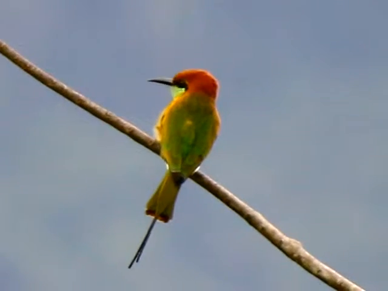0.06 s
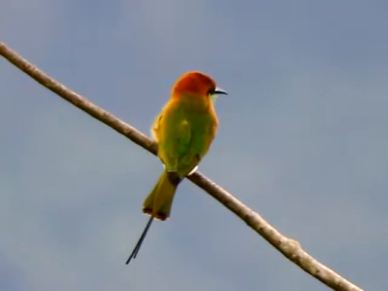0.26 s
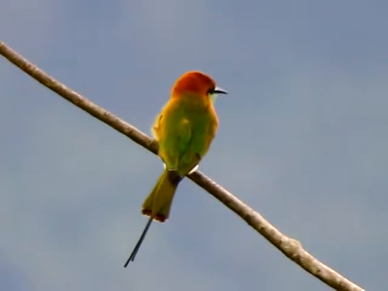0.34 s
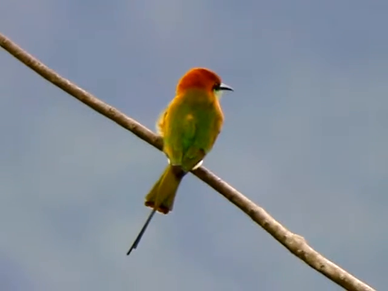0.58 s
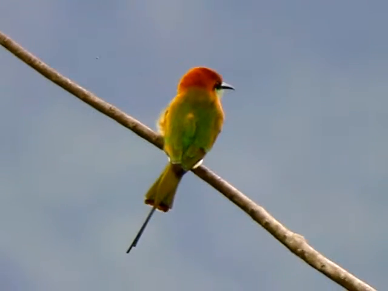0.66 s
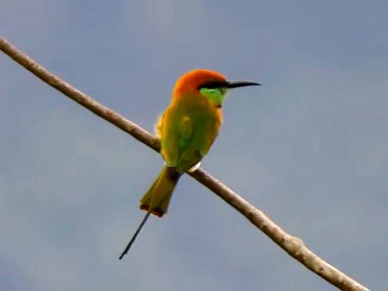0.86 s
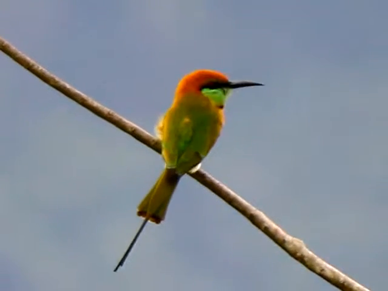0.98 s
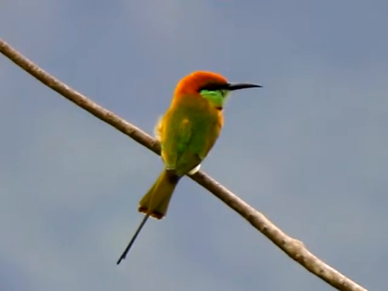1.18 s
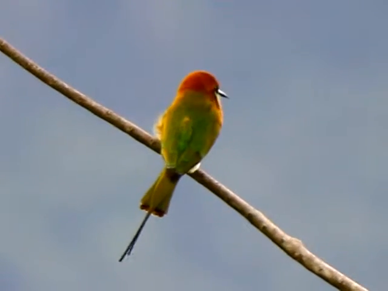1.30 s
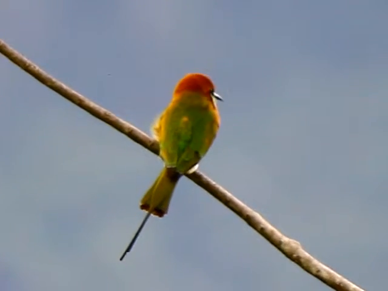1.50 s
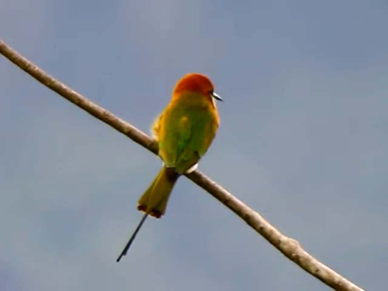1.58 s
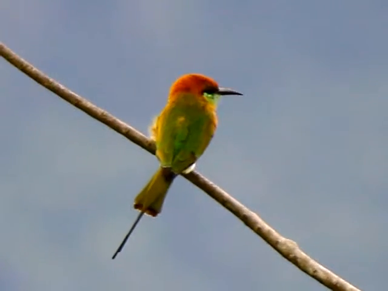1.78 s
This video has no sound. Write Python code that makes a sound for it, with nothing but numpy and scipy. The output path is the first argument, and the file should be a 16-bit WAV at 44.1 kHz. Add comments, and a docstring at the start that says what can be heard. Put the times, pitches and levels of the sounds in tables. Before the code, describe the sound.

A steady cricket chorus, as wind bumps the microphone and a bird calls once.

```python
"""Crickets trill in chorus, each wing stroke a short falling tone, over far rumble and open-air hiss.
A puff of wind thumps the microphone and leaves a low flutter.
A bird then gives one buzzy, falling call that clears into a whistle, and a soft afternote.
Trees scatter the crickets and the bird; a thin electrical whine sits at the very top."""
import sys
import numpy as np
from scipy import signal
from scipy.fft import rfft, irfft, next_fast_len
from scipy.io import wavfile
from scipy.ndimage import map_coordinates

SR = 44100
rng = np.random.default_rng(int(sys.argv[2]) if len(sys.argv) > 2 else 0)


def store_wav(level_fs):
    """Save 16-bit WAV to argv[1]."""
    pcm = np.round(np.clip(np.atleast_2d(level_fs), -1, 1) * 32767)
    wavfile.write(sys.argv[1], SR, pcm.T.astype(np.int16))


N = 81585
T = np.arange(N) / SR


def amp(db):
    """Decibels to gain."""
    return 10 ** (np.asarray(db) / 20)


def unit_rms(x):
    """Scale to rms 1."""
    return x / np.sqrt(np.mean(x ** 2) + 1e-20)


def gain_at(points, hz):
    """Gain from (Hz, dB) points on a log frequency axis."""
    knot_hz, db = np.transpose(points)
    return amp(np.interp(np.log(hz + 1), np.log(knot_hz + 1), db))


def curves(rows):
    """Per-sample curve for each column after time."""
    time_s, *columns = np.transpose(rows)
    return [np.interp(T, time_s, column) for column in columns]


def wobble(rate_hz):
    """Smooth random curve with knots at rate_hz."""
    return map_coordinates(rng.standard_normal(4096), [T * rate_hz], mode="wrap")


def filtered(x, response):
    """Apply a complex frequency response."""
    size = next_fast_len(N + SR // 2)
    hz = np.fft.rfftfreq(size, 1 / SR)
    return irfft(rfft(x, size) * response(hz), size)[:N]


def noise(spectrum):
    """Coloured noise, rms 1."""
    return unit_rms(filtered(rng.standard_normal(N), lambda hz: gain_at(spectrum, hz)))


def phase_of(hz):
    """Integrate frequency to phase in radians."""
    return 2 * np.pi * np.cumsum(hz) / SR


def tree_scatter(x, t60_s):
    """Diffuse tail from trunks and leaves."""
    t = T[:SR // 2]
    build_up = 1 - np.exp(-t / .006)
    tail = rng.standard_normal(len(t)) * amp(-60 * t / t60_s) * build_up
    return signal.fftconvolve(x, tail / np.linalg.norm(tail))[:N]


def wing_strokes(rate_hz, first_s, pitch_hz):
    """Cricket stroke train, rms 1: each stroke is a short falling tone."""
    stroke_s, fall_hz = .015, 228.3
    jitter_s, scatter_hz, scatter_db = .001027, 27.8, 2.3
    index = np.floor((T - first_s) * rate_hz + .5).astype(int)
    late, sharp, strong = rng.standard_normal((128, 3))[index % 128].T
    centre_s = first_s + index / rate_hz + jitter_s * late
    position = np.clip((T - centre_s) / stroke_s, -.5, .5)
    swell = np.cos(np.pi * position) * amp(scatter_db * strong)
    hz = pitch_hz - fall_hz * position + scatter_hz * sharp
    return unit_rms(swell * np.sin(phase_of(hz)))


# Nearest cricket, two strokes per wing cycle: (cycle rate [Hz], first stroke [s])
LEAD_TIMING = [(22.64, .036), (22.64, .0065)]
# Its two strokes: (pitch [Hz], level [dB])
LEAD_TONES = [(4730, -52.5), (4770, -51)]
# Neighbouring crickets: (stroke rate [Hz], first stroke [s], pitch [Hz], level [dB])
NEIGHBOURS = [(61.63, 0.00974, 4600, -56), (33.25, 0.0202, 4450, -57)]
# Highest cricket: (stroke rate [Hz], first stroke [s], pitch [Hz])
HIGH_CRICKET = (22.4, 0.0336, 4940)
# Its envelope: (time [s], level [dB])
HIGH_CRICKET_LEVEL = [(0, -56), (1.05, -62), (1.2, -55), (1.65, -51.5), (1.85, -56)]


def near_crickets():
    """Four crickets rub their wings; trees scatter the trills."""
    lead = sum(amp(db) * wing_strokes(*timing, hz) for timing, (hz, db) in zip(LEAD_TIMING, LEAD_TONES))
    neighbours = sum(amp(db) * wing_strokes(*strokes) for *strokes, db in NEIGHBOURS)
    highest = amp(curves(HIGH_CRICKET_LEVEL)[0]) * wing_strokes(*HIGH_CRICKET)
    direct = lead + neighbours + highest
    return direct + amp(-4.5) * tree_scatter(direct, t60_s=.27)


# Far chorus band: (frequency [Hz], relative density [dB])
FAR_SPECTRUM = [(3800, -50), (4150, -10), (4400, -1.5), (4650, -4.5), (4980, -5), (5100, -16), (5400, -55)]
# Far chorus envelope: (time [s], level [dB])
FAR_LEVEL = [(0, -48.5), (.5, -53.5), (1.05, -52.5), (1.3, -48), (1.85, -52.5)]


def far_crickets():
    """Many distant crickets blur into a noise band."""
    return amp(curves(FAR_LEVEL)[0]) * noise(FAR_SPECTRUM)


# Ambient noise bands: (frequency [Hz], relative density [dB])
RUMBLE_SPECTRUM = [(20, -46), (50, -19), (85, -2), (110, -9.5), (135, 4.5), (175, -3.5), (240, -14.5),
                   (400, -22), (1000, -81)]
AIR_SPECTRUM = [(100, -23), (270, -6.5), (420, 1.5), (600, -1), (850, -7), (1100, -9), (1450, -7.5),
                (1900, -11), (2700, -11.5), (3800, -13), (5500, -15.5), (8000, -29.5), (15700, -27.5)]
HISS_SPECTRUM = [(4500, -43), (5900, -14.5), (6450, -3), (6850, -6.5), (7500, 1.5), (7950, -3.5),
                 (8400, -0.5), (9000, 0), (9450, -9.5), (10200, -4), (10900, -3), (11700, -15.5),
                 (13000, -21), (15700, -13.5)]


def open_air():
    """Far rumble, slightly wavering broadband air and high hiss."""
    rumble = amp(-47) * noise(RUMBLE_SPECTRUM)
    air = amp(-47.5 + .36 * wobble(rate_hz=4.03)) * noise(AIR_SPECTRUM)
    hiss = amp(-51) * noise(HISS_SPECTRUM)
    return rumble + air + hiss


# Steady tones: (frequency [Hz], rms level [dB])
WHINE_TONES = [(1254, -65.5), (15696, -59)]


def whine():
    """Thin electrical whine above a fainter midrange tone."""
    return sum(np.sqrt(2) * amp(db) * np.sin(2 * np.pi * hz * T) for hz, db in WHINE_TONES)


# Flutter envelope: (time [s], level [dB])
FLUTTER_LEVEL = [(0, -52.5), (.19, -49), (.25, -34), (.3, -18), (.35, -33.5), (.42, -36), (.46, -41.5),
                 (.56, -38.5), (.66, -43.5), (.71, -34.5), (.77, -54), (.815, -47), (.84, -35.5),
                 (.87, -36), (.915, -42.5), (.96, -50), (1.15, -50.5), (1.85, -53)]
# Flutter band: (frequency [Hz], relative density [dB])
FLUTTER_BAND = [(20, -22), (45, -0.5), (80, 4), (150, -6.5), (260, -23.5), (600, -48), (1500, -77)]


def wind_flutter():
    """Low noise of wind on the microphone, peaking with the puff."""
    return amp(curves(FLUTTER_LEVEL)[0]) * noise(FLUTTER_BAND)


# Gaussian pressure bumps: (time [s], relative peak [dB], sigma [s])
PRESSURE_BUMPS = [(.2088, -16, .0012), (.227, -18, 0.0013), (.2379, -2.5, 0.00095), (.267, -17, 0.0017),
                  (0.2886, -6, 0.0014), (.297, 1, 0.00069), (0.3005, -7, 0.00059), (0.3098, -6, 0.00074),
                  (.3133, -10, 0.00052), (0.317, -14, 0.00018), (0.3204, 1.5, 0.0007),
                  (0.3264, -10.5, 0.00048), (0.3297, -5.5, 0.0011), (.415, -17, 0.0021),
                  (.721, -22.5, .0012), (.835, -25, 0.0035), (.857, -24, 0.0032), (.903, -22, 0.0026),
                  (1.001, -21.5, 0.0021)]
# Turbulent scuff: (frequency [Hz], relative density [dB])
SCUFF_SPECTRUM = [(150, -5), (300, -1.5), (420, -8.5), (600, -8.5), (880, -10), (1200, -28), (2200, -46),
                  (4000, -90)]


def wind_thumps():
    """Pressure bumps pass the microphone's bass roll-off; the steepest add turbulence."""
    corner_hz = 115
    pressure = sum(amp(db) * np.exp(-.5 * ((T - time_s) / sigma_s) ** 2)
                   for time_s, db, sigma_s in PRESSURE_BUMPS)
    thumps = filtered(pressure, lambda hz: hz ** 2 / np.hypot(hz ** 2, corner_hz ** 2))
    slope = np.abs(np.gradient(pressure))
    steepness = np.abs(signal.fftconvolve(slope, np.hanning(SR // 50), "same"))  # 20 ms smoothing
    scuff = (steepness / steepness.max()) ** 3 * noise(SCUFF_SPECTRUM)
    return amp(1.5) * thumps + amp(-19.5) * scuff


# Beak colouring of the second harmonic: (frequency [Hz], gain [dB])
BEAK_RESPONSE = [(5600, 1), (6500, 5), (7600, 4.5), (8600, -3), (10500, -4)]


def bird_note(rows):
    """Whistle swung by a fast, uneven buzz; harshness adds jitter and a tone an octave below."""
    buzz_hz, rasp_rate_hz, jitter_hz, waver_db = 290, 300, 264, 1.8
    pitch_hz, db, swing_hz, harshness, overtone_db = curves(rows)
    buzz_phase = phase_of(buzz_hz * (1 + .2 * wobble(rate_hz=200)))
    rasp = np.tanh(2 * (np.sin(buzz_phase) + .6 * wobble(rasp_rate_hz)))
    phase = phase_of(pitch_hz + swing_hz * rasp + jitter_hz * harshness * wobble(rate_hz=900))
    overtone = amp(overtone_db) * filtered(np.sin(2 * phase), lambda hz: gain_at(BEAK_RESPONSE, hz))
    subtone = amp(-8.5) * harshness * np.sin(phase / 2)
    pulse_depth = .25 * swing_hz / swing_hz.max()
    pulsing = 1 + pulse_depth * (np.cos(buzz_phase) + .5 * wobble(rasp_rate_hz))
    gate = (T > rows[0][0]) & (T < rows[-1][0])
    envelope = np.sqrt(2) * amp(db + waver_db * wobble(rate_hz=150)) * pulsing * gate
    return envelope * (np.sin(phase) + overtone + subtone)


# Bird notes: (time [s], pitch [Hz], level [dB], buzz swing [Hz], harshness [0-1],
# relative second harmonic before the beak [dB])
FALLING_CALL = [(.485, 4950, -58, 250, .05, -30), (.496, 5050, -44.5, 280, 0.13, -30),
                (.535, 5150, -39, 340, .1, -32), (.545, 4667, -37, 400, 0.16, -28),
                (.575, 4620, -36, 480, 0.03, -19), (.603, 4624, -31, 530, 0.05, -15),
                (.62, 4063, -35.5, 510, 0.06, -13), (.632, 3450, -37.5, 420, .7, -16),
                (.655, 3500, -37.5, 280, .9, -19), (.6595, 3450, -43, 200, .5, -22),
                (.665, 3400, -33.5, 70, .15, -26), (.672, 3600, -35, 200, .8, -24),
                (.68, 3350, -42, 380, .8, -22), (.684, 2950, -35, 30, .1, -28),
                (.712, 2840, -42, 10, 0.13, -13), (.746, 2770, -38, 10, .02, -11),
                (.756, 2790, -51, 10, 0.1, -7), (.785, 2800, -60, 10, .02, -5)]
SOFT_AFTERNOTE = [(.82, 2750, -60, 60, .2, -26), (.83, 2590, -41.5, 80.3, 0.21, -26),
                  (.838, 2304, -52, 400, .9, -26), (.85, 2320, -40.5, 30, .1, -26),
                  (.86, 2280, -58, 29.8, 0.12, -26)]
# Tree-line reflection: (frequency [Hz], relative gain [dB])
TREE_LINE_RESPONSE = [(2000, -6), (2800, 2), (3400, -10), (4700, -8), (5600, -3)]


def bird():
    """Call and afternote, with diffuse scatter and one echo off the tree line."""
    delay_s = .062
    song = bird_note(FALLING_CALL) + bird_note(SOFT_AFTERNOTE)
    echo = filtered(song, lambda hz: gain_at(TREE_LINE_RESPONSE, hz) * np.exp(-2j * np.pi * hz * delay_s))
    return song + amp(-11) * tree_scatter(song, t60_s=.67) + amp(-12) * echo


def scene():
    """Mono sum at the microphone."""
    bed = near_crickets() + far_crickets() + open_air() + whine()
    return (bed + wind_flutter() + wind_thumps() + bird())[None]


def record(dry):
    """Soft peak limiter, then brick-wall low-pass."""
    ceiling, cutoff_hz = .98, 15760
    limited = dry[0] / (1 + np.abs(dry[0] / ceiling) ** 6) ** (1 / 6)
    return filtered(limited, lambda hz: hz < cutoff_hz)[None]


dry = scene()
out = record(dry)
store_wav(out)
```